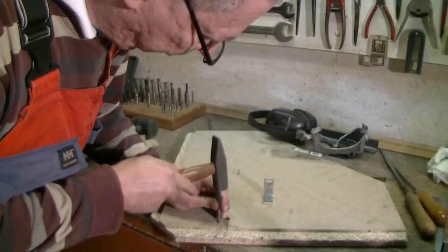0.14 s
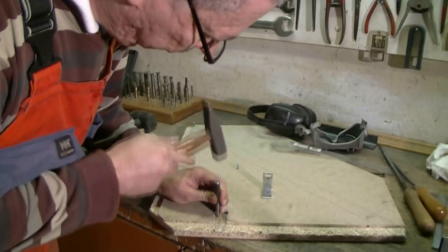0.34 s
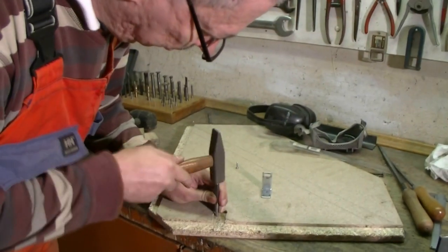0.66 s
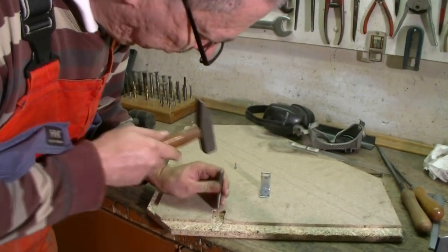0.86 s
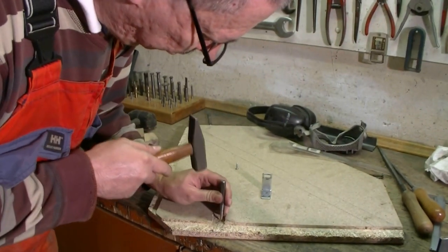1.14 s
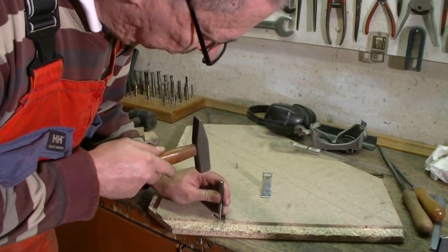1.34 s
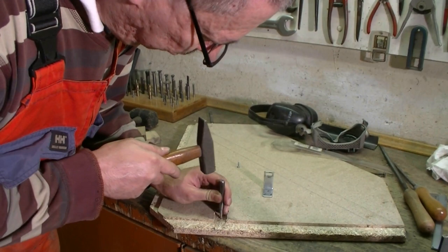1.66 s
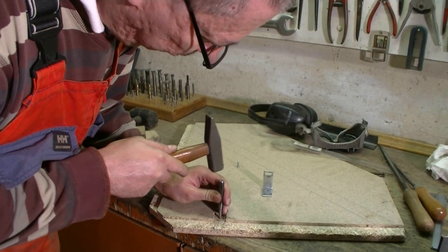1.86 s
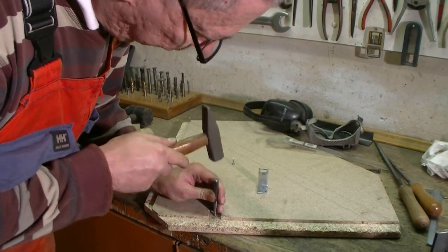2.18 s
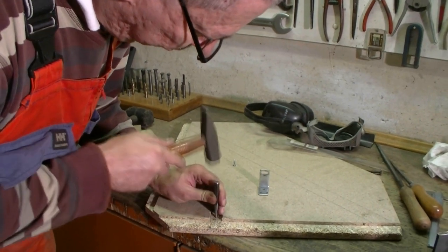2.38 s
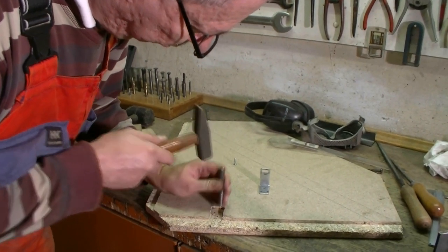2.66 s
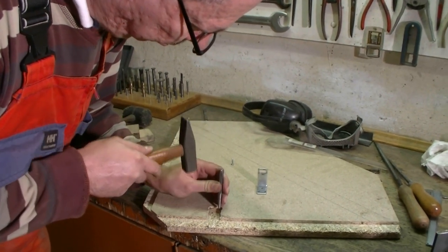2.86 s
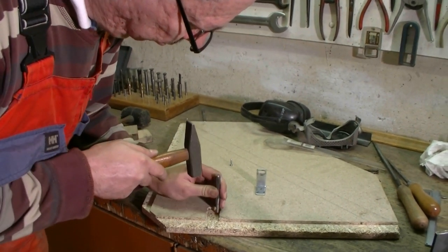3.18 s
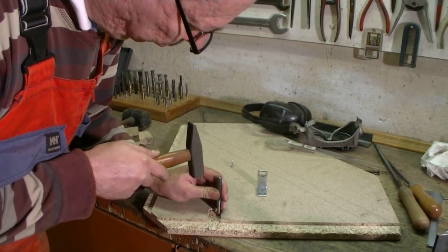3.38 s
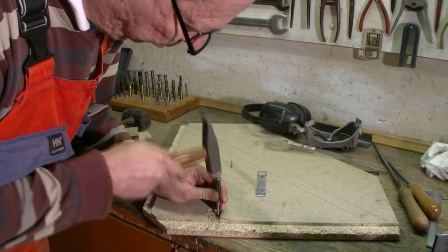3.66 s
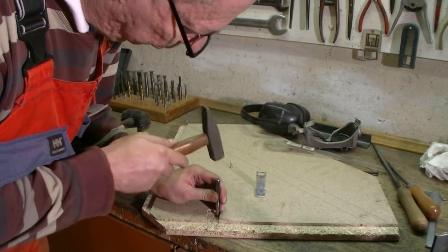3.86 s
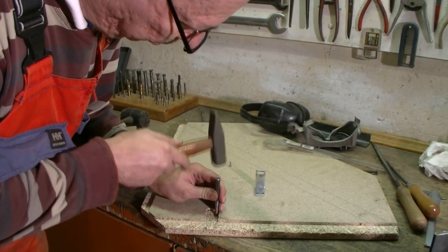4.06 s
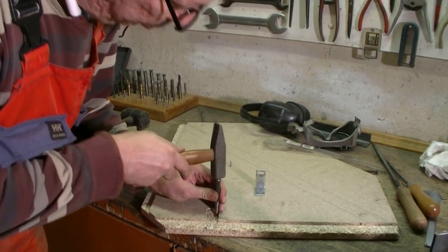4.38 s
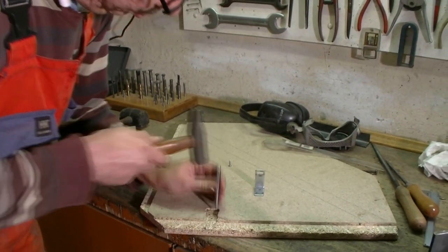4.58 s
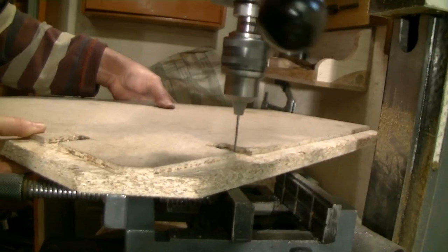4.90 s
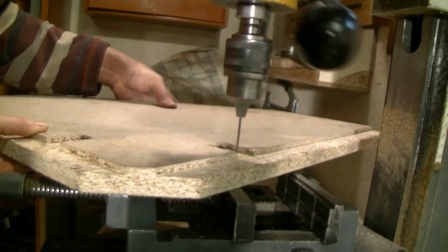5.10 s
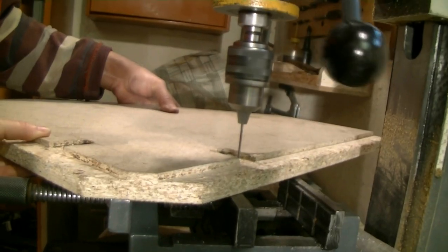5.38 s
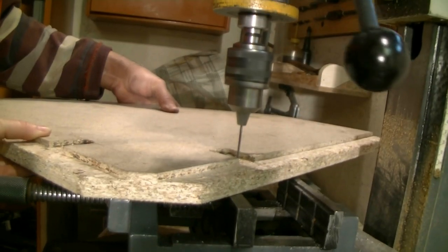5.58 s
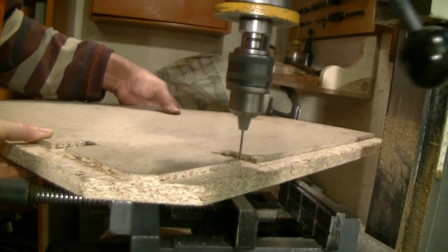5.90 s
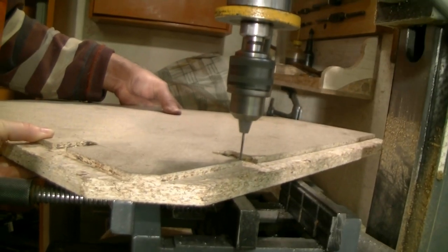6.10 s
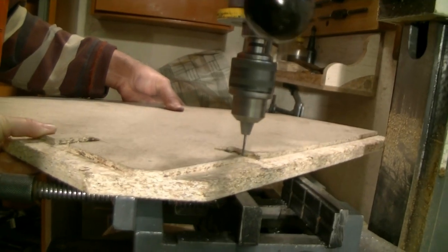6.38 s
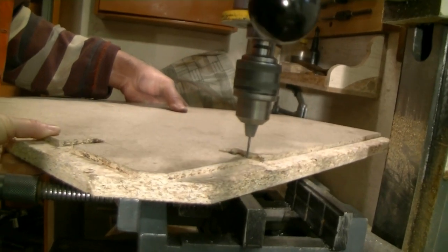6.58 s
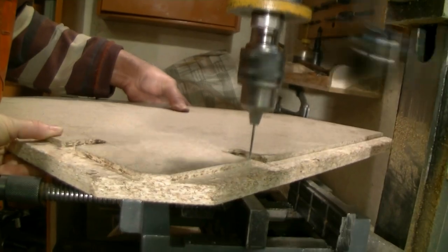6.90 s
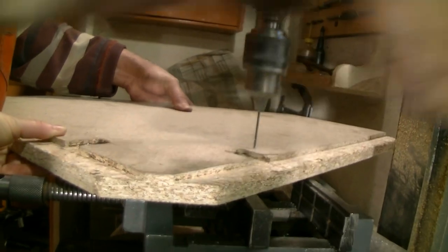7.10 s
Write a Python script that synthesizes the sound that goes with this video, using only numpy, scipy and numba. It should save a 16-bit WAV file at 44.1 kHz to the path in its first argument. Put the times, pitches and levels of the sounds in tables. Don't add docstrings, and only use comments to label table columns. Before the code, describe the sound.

Sharp metallic hammering on board over a resonant bench, three short bursts with pauses, cuts abruptly to a clattering, whirring drill press biting chipboard.

```python
import sys
import numpy as np
from scipy import signal
from scipy.fft import rfft, irfft
from scipy.io import wavfile
from scipy.ndimage import uniform_filter1d
from numba import njit

SR = 44100
rng = np.random.default_rng(int(sys.argv[2]) if len(sys.argv) > 2 else 0)


def pcm_store(signal):
    levels = np.round(np.clip(np.atleast_2d(signal), -1, 1) * 32767)
    wavfile.write(sys.argv[1], SR, levels.astype(np.int16).T)


def amplitude_ratio(level_db):
    exponent = np.asarray(level_db, float) / 20
    return 10 ** exponent


N = 319725
T = np.arange(N) / SR
HZ = np.fft.rfftfreq(N, 1 / SR) + 1e-3
DRILL_S = 4.7235

# centre in Hz, width in Hz, level in dB, 60 dB decay in s.
BOARD = [(2760, 320, -3.5, 0.36), (3860, 1100, -5.5, 0.32), (4785, 210, -3, 0.28), (7284, 1100, -5, 0.23)]


def level(x, db):
    return x * amplitude_ratio(db) / np.sqrt(np.mean(x ** 2))


def on_log(table, hz, col=1):
    table = np.array(table)
    return np.interp(np.log(hz), np.log(table[:, 0]), table[:, col])


def spread(spec):
    # frequency in Hz, side minus mid in dB.
    width_db = [(35, -1), (60, -28.5), (130, -44.5), (250, -26), (500, -21), (1000, -23), (2000, -13.5),
                (4000, -12), (6500, -13), (9000, -11.5), (11000, -13), (14000, -23.5)]
    side = spec * amplitude_ratio(on_log(width_db, HZ)) * np.exp(2j * np.pi * rng.random(len(HZ)))
    return irfft(np.array([spec + side, spec - side]), N)


def noise():
    return rfft(rng.standard_normal(N))


def coloured(colour):
    return level(spread(noise() * amplitude_ratio(on_log(colour, HZ))), 0)


def band(lo_hz, hi_hz, order=8):
    return 1 / np.sqrt((1 + (lo_hz / HZ) ** order) * (1 + (HZ / hi_hz) ** order))


def hum(hz, width, db, order=1):
    return level(spread(noise() / (1 + 2j * (HZ - hz) / width) ** order), db)


def walk(rate):
    k = int(SR / rate)
    held = np.repeat(rng.standard_normal(N // k + 1), k)
    return uniform_filter1d(uniform_filter1d(held, k), k)[:N]


def ring(modes, t, rise, scatter_db):
    hz, db, t60 = np.array(modes).T[..., None]
    luck = rng.standard_normal((3, len(modes), 1))
    size = amplitude_ratio(db + scatter_db * luck[0] - 60 * t / t60) * (1 - np.exp(-t / rise))
    phase = 2 * np.pi * hz * (1 + 0.0036 * luck[1]) * t + 9 * luck[1]
    return np.array([np.sum(size * np.sin(phase + ear * .05 * luck[2]), 0) for ear in (1, -1)])


def workshop():
    # frequency in Hz, level in dB per Hz.
    floor = [(15, -41), (25, -7.5), (192, -9), (245, -14.5), (348, -12), (553, -13.5), (746, -7),
             (809, -8.5), (1320, -18), (3230, -22), (4480, -24), (6370, -29.5), (7100, -30), (15200, -38.5),
             (16500, -42.5)]
    # centre in Hz, width in Hz, level in dB.
    hums = [(352, 5.8, -62), (313, 21, -67), (670, 44, -65), (816, 60, -80), (3280, 120, -80.5),
            (6300, 350, -72.5)]
    air = coloured(floor) + sum(hum(hz, width, db + 57) for hz, width, db in hums)
    opening_db = np.interp(T, [0, .06], [-3.5, 0])
    return air * amplitude_ratio(-54 + opening_db + 2 * (T > DRILL_S) + 1.3 * walk(5.5))


def chatter(count=10):
    start_s, knock_hz, knock_db = .107, 50.9, -39
    age = np.arange(count) / knock_hz
    rise_db = -4 * np.exp(-age / .015)
    fade_db = 480 * np.clip(age - .138, 0, .032)
    db = knock_db + rise_db - fade_db
    return [(start_s + a, d, 5200 - 3500 * a, 1.4, .0062) for a, d in zip(age, db)]


def ticks():
    # start in seconds, level in
    # dB, centre in Hz, width in octaves, length in s.
    stray = [(0.772, -59, 10770, .2, 0.002), (.83, -65, 8950, .6, 0.045), (1.891, -51.5, 2380, 1.6, 0.024),
             (1.897, -55, 8260, .3, .006), (2.608, -58, 10500, .07, .009), (2.625, -53, 10600, .07, .009),
             (2.898, -52, 2500, 1.4, .005), (3.3, -64, 2200, 2, 0.3), (3.425, -55.5, 3000, 2, 0.012),
             (4.645, -43, 1690, 0.32, .06), (4.602, -38, 3500, 2.1, 0.0044),
             (5.666, -34, 8750, 0.54, 0.005), (6.109, -37, 8500, .7, .004), (6.304, -42, 6360, 1, .004),
             (6.47, -34, 4000, .8, 0.0036)]
    out, t = np.zeros((2, N)), T[:12000]
    for s, db, hz, octaves, length in chatter() + stray:
        at = slice(int(s * SR), int(s * SR) + len(t))
        colour = np.exp(-(np.log2(HZ / hz) * 2 / octaves) ** 4 / 2)
        burst = level(spread(noise() * colour), db)
        out[:, at] += burst[:, at] * np.exp(-(t / length) ** 2) * np.minimum(5 * t / length, 1)
    return out


def rustle():
    # frequency in Hz, level in dB per Hz.
    cloth = [(35, -45), (60, -18), (188, -25), (372, 3), (524, -18), (886, -4), (1340, -16), (1640, -10.5),
             (6750, -24), (14000, -53)]
    start_s, rise_s, fall_db_per_s = 4.6, 0.098, 220
    age = T - start_s
    db = np.interp(age, [0, rise_s], [-54, -36]) - fall_db_per_s * np.maximum(age - rise_s, 0)
    return coloured(cloth) * amplitude_ratio(db) * ((age > 0) & (T < DRILL_S))


def drill():
    # time in seconds, load from 0 to 1.
    feed = [
        (4.72, 0.46),
        (5.099, 0.4),
        (5.498, 0.4),
        (5.9, 0.59),
        (6.25, 0.8),
        (6.55, 0.84),
        (6.8, 0.75),
        (7.05, 0.09),
        (7.25, .05),
    ]
    # idle dB, added dB at full load, added dB while settling.
    drive = [
        (-40, 14, 3),
        (-26.5, 2.5, -3.5),
        (-25.5, -1.7, 0.5),
        (-30, 2.2, 2.4),
        (1.6, -1.3, 1.5),
    ]
    # frequency in Hz, level in dB per Hz.
    motor = [(24, -64), (40, -31), (69, -36), (108, -9.5), (139, -5.5), (178, 8.5), (332, -10.5),
             (403, -15.5), (618, -13), (779, -3), (1050, -13), (1330, -6), (2030, -9), (2800, -13),
             (3640, -43), (6160, -120)]
    # frequency in Hz, level in dB per Hz.
    cutting = [(2000, 0.5), (2800, 0.5), (3600, -6.5), (4500, -11.5), (5400, -18.5), (7200, -23.5),
               (8000, -20), (9800, -30), (11000, -30), (12800, -43), (14300, -38), (15200, -50),
               (15700, -70)]
    # frequency in Hz, level in dB.
    casing = [(102.3, -52.5), (123.8, -48.5), (188.4, -43), (409.1, -41.5), (441.4, -42), (522.2, -35.5),
              (764.4, -32), (845.2, -31), (990.5, -39.5), (1206, -37), (1303, -30), (1459, -30),
              (1712, -38.5), (1857, -31.5), (2046, -46.5), (2234, -34.5), (2331, -33.5), (2492, -34.5)]
    # centre in Hz, width in Hz, level in dB.
    bearing = [(693, 48, -31.5), (1127, 46, -46), (1580, 89, -30), (1888, 17, -38), (2990, 82, -39),
               (3281, 79, -35), (3940, 100, -39.5), (4925, 320, -45.5), (6650, 170, -55),
               (8040, 110, -54.5), (8740, 100, -59.5), (9510, 500, -55), (13780, 180, -68),
               (14400, 80, -72)]
    shaft_hz, settle_s = 20.63, 0.067
    load = np.interp(T, *np.transpose(feed))
    settling = np.exp(-np.maximum(T - DRILL_S, 0) / settle_s)
    *region_db, ring_db = (idle_db + load_db * load + start_db * settling
                           for idle_db, load_db, start_db in drive)

    repeat = np.clip(0.91 / (1 + HZ / 900), 0, .95)
    beat = amplitude_ratio(2.0 * np.cos(2 * np.pi * shaft_hz * T) + 1.0 * walk(150))
    one_turn_later = np.exp(-2j * np.pi * HZ / shaft_hz)
    clatter = rfft(rng.standard_normal(N) * beat) / (1 - repeat * one_turn_later)

    out = sum(hum(hz, width, db, order=2) for hz, width, db in bearing)
    out = out * amplitude_ratio(-1.5 * (load - .5))
    regions = [(20, 450, motor), (450, 1050, motor), (1050, 2800, motor), (2800, 20000, cutting)]
    for (lo, hi, colour), db in zip(regions, region_db):
        part = spread(clatter * amplitude_ratio(on_log(colour, HZ)) * band(lo, hi))
        out = out + level(part, -1.55) * amplitude_ratio(db)
        rings = sum(hum(hz, 8 + hz / 200, line_db) * amplitude_ratio(2.2 * walk(2.84))
                    for hz, line_db in casing if lo < hz <= hi)
        out = out + rings * amplitude_ratio(db - np.mean(db[T > DRILL_S]) + ring_db)
    return out * np.clip((T - DRILL_S) / 0.0019, 0, 1)


def room_bands(t):
    # frequency in Hz, level in dB, 60 dB decay in s, build-up in s.
    tail = [(35, -38.5, 0.51, .02), (70, -12.5, 0.63, 0.011), (127, 2, 0.39, 0.012), (250, -3, 0.62, 0.032),
            (350, 6, 0.42, 0.016), (560, 3.5, 0.37, 0.0035), (810, 7.5, 0.33, 0.019),
            (1297, -3, 0.31, 0.021), (2000, 1, 0.33, 0.0023), (5000, -3, 0.29, 0.0026),
            (10500, -25.5, 0.29, .002), (11800, -21, 0.213, 0.0017), (12970, -44, 0.17, .002),
            (16000, -69, 0.13, .002)]
    edge = 2 ** (1 / 6)
    bands = []
    for hz in 40 * 2 ** np.arange(0, 8.7, 1 / 3):
        hiss = level(spread(noise() * band(hz / edge, hz * edge)), on_log(tail, hz))
        build = 1 - np.exp(-t / on_log(tail, hz, col=3))
        bands.append((hz, hiss, build * amplitude_ratio(-60 * t / on_log(tail, hz, col=2))))
    return bands


def clusters():
    # centre in Hz, width in Hz, level in dB, 60 dB decay in s.
    rack = [(2010, 300, -23, 0.45), (3415, 340, -16, 0.38), (8500, 500, -15.5, 0.27),
            (10180, 590, -16, 0.23)]
    steel_hz = [9010, 9920, 11620, 12900]
    # width in Hz, level in dB, 60 dB decay in s.
    steel_rows = [
        (166.7, -3.5, 0.25),
        (300, -21, 0.15),
        (200, -12, 0.16),
        (201, -40, .15),
    ]
    steel = [(hz, *row) for hz, row in zip(steel_hz, steel_rows)]
    return [(hum(hz, width, db, order=2), t60) for hz, width, db, t60 in BOARD + rack + steel]


def shares(peak_db, punch_db, edge_hz):
    # share in a full blow in dB, change in dB per dB lighter, change in dB per octave duller.
    hollow, boom, thud = (1.2, -.2, -1.5), (-.3, .6, -5.5), (-0.8, -.1, -3)
    # dB, dB per dB, dB per octave.
    board_share = [(3, 0.027, -1.1), (3.4, -0.33, 2), (1.5, .1, -.3), (-1.7, .3, -1.5)]
    # dB, dB per dB, dB per octave.
    rack_share = [(-1.8, 0.29, 7.5), (-.9, .35, 4.5), (-1.4, .65, -8.5), (-0.48, .15, -2.3)]
    grip_db = (-0.19, 0.035, 0.014, -0.016, -0.084, -0.064, .02, -.1, .02, .05, -0.14)
    lighter_db = 8 - peak_db
    duller = np.log2(5500 / edge_hz)
    rows = [hollow, boom, thud] + board_share + rack_share
    cavity_db, boom_db, thud_db, *wood_db = (db + slope * lighter_db + dull * duller + grip * punch_db
                                             for (db, slope, dull), grip in zip(rows, grip_db))
    wood_db[2] += -11 * (BOARD[2][0] > edge_hz)
    return cavity_db, boom_db, thud_db, wood_db


def bench(t, thud_db, cavity_db):
    # frequency in Hz, level in dB, 60 dB decay in s.
    bench_modes = [(125.2, -18.5, 0.78), (167.4, -5.5, 0.33), (208.5, -8.5, 0.64), (284.5, -11.5, 0.95),
                   (321.4, -5.5, 0.54), (352, -3.5, 0.52), (397.5, -6, 0.33), (554, -22, 0.25),
                   (647, -11, 0.36), (690, -10.5, 0.37), (805, -9, 0.37)]
    # frequency in Hz, level in dB, 60 dB decay in s.
    cavity = [(347, 0.5, 0.51), (330.4, -15, 0.67), (292, -6.5, 0.3)]
    # frequency in Hz, level in dB, 60 dB decay in s.
    tools = [(1620, -57.5, 1.35), (2560, -58, 1), (536, -52.5, 1.7), (282.6, -43, 1.6)]
    modes = amplitude_ratio(thud_db - 15) * ring(bench_modes, t, 0.0067, scatter_db=2)
    modes = modes + amplitude_ratio(cavity_db - 18) * ring(cavity, t, 0.072, scatter_db=1)
    return modes + ring(tools, t, 0.00935, scatter_db=3)


def hammer():
    # start in seconds, peak in dB, punch ring in dB, head ring in dB, treble edge in Hz.
    blows = [
        (0.062, -9.5, -22.5, 1, 3580),
        (0.3103, 8.5, -25.5, -27, 5800),
        (.561, 10.5, -25, -4, 6300),
        (1.9425, -5, 3, -4, 5000),
        (2.1795, 7, 2, -26, 7840),
        (2.382, 9, 1.5, -22.5, 6500),
        (3.608, -3.5, 3.5, -6, 5200),
        (3.8473, 7, -3, -6.5, 5270),
        (4.068, 10, -18.5, 0.5, 4600),
        (4.229, 7.5, -7.5, 1, 5440),
    ]
    # frequency in Hz, level in dB per Hz.
    crack_colour = [(180, -45.5), (300, -3.5), (1930, -1), (2650, 5.5), (3300, -2.5), (3970, 6.5),
                    (6130, -12.5), (8160, -9), (9020, -6), (16500, -22)]
    out, t, f = np.zeros((2, N)), T[:SR], np.fft.rfftfreq(SR, 1 / SR)
    bands, resonances, crack = room_bands(t), clusters(), coloured(crack_colour)
    for s, peak_db, punch_db, head_db, edge_hz in blows:
        cavity_db, boom_db, thud_db, wood_db = shares(peak_db, punch_db, edge_hz)
        at = slice(int(s * SR), int(s * SR) + SR)
        blow = amplitude_ratio(-6) * crack[:, at] * np.exp(-(t / 0.0086) ** 2) * np.minimum(t / 0.0018, 1)

        room = 0
        for hz, hiss, envelope in bands:
            tilt_db = np.interp(np.log(hz), np.log([130, 200, 600, 1500]), [boom_db, thud_db, thud_db, 0])
            room = room + hiss[:, at] * envelope * amplitude_ratio(tilt_db)
        patch_db = 3 * np.interp(f, np.arange(0, 22200, 180), rng.standard_normal(124))
        patch_db = patch_db * np.clip(f / 800 - 1, 0, 1)
        treble_db = 5.3 + 0.067 * punch_db - 10
        shelf_db = treble_db / (1 + np.exp((edge_hz - f) / 45))
        room = irfft(rfft(room) * amplitude_ratio(patch_db + shelf_db), SR)
        room = room * np.clip((.9 - t) / .2, 0, 1)

        steel_db = [punch_db] * 2 + [head_db] * 2
        for (buzz, t60), db in zip(resonances, wood_db + steel_db):
            room = room + buzz[:, at] * amplitude_ratio(db - 60 * t / t60) * np.minimum(t / 0.00087, 1)
        clang = sum(buzz[:, at].mean(axis=0) * amplitude_ratio(db) for (buzz, _), db in zip(resonances[-4:], steel_db))
        room = room + clang * amplitude_ratio(13) * np.exp(-(t / 0.0092) ** 2) * np.minimum(t / 0.00071, 1)
        out[:, at] += amplitude_ratio(peak_db) * (blow + amplitude_ratio(-23) * room + bench(t, thud_db, cavity_db))
    return out


def scene():
    return workshop() + ticks() + rustle() + drill() + hammer()


@njit
def limit(x, top, ratio, attack, release, slew):
    y, e, g = np.empty_like(x), 0., 1.
    for i in range(x.shape[1]):
        a = max(abs(x[0, i]), abs(x[1, i]))
        e += (a - e) * (attack if a > e else release)
        g += (min(1., (top / (e + 1e-9)) ** (1 - 1 / ratio)) - g) * slew
        y[:, i] = x[:, i] * g
    return y


def band_limit(x):
    return signal.sosfilt(signal.butter(12, 16640, fs=SR, output="sos"), x)


def record(dry):
    heard = irfft(rfft(dry) * band(61, 30000, order=4), N)
    attack, release, slew = 1 / (0.00045 * SR), 1 / (0.01 * SR), 1 / (0.00033 * SR)
    held = limit(heard, 0.29, 22.0, attack, release, slew)
    roof = .63
    rounded = held / (1 + (held / roof) ** 8) ** (1 / 8)
    mix = irfft(rfft(rounded) * band(1, 15450, order=60), N)
    return band_limit(mix)


dry = scene()
out = record(dry)
pcm_store(out)
```